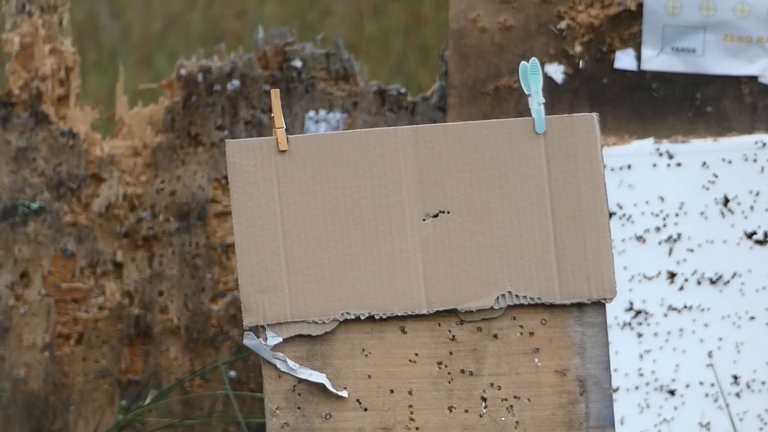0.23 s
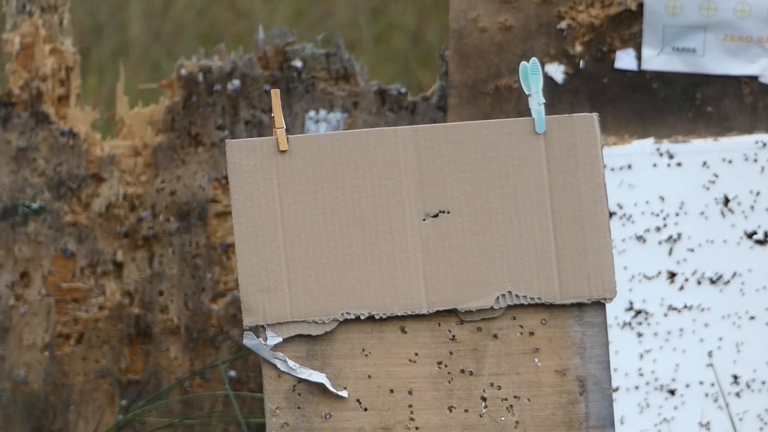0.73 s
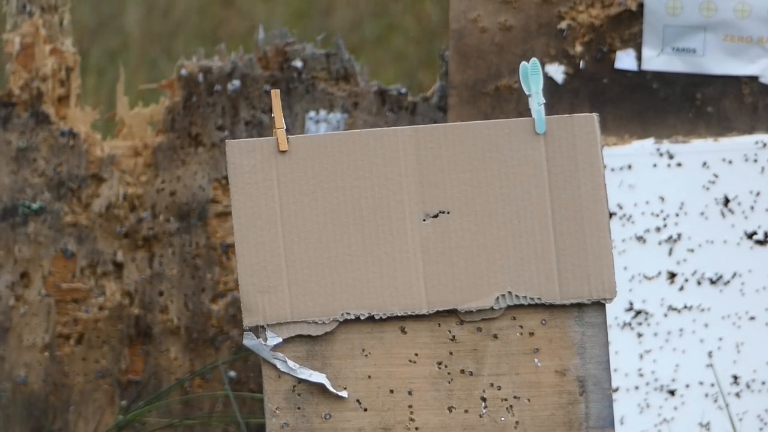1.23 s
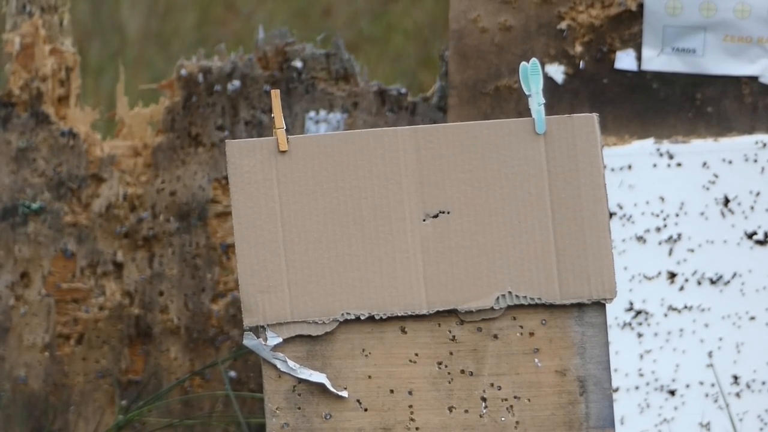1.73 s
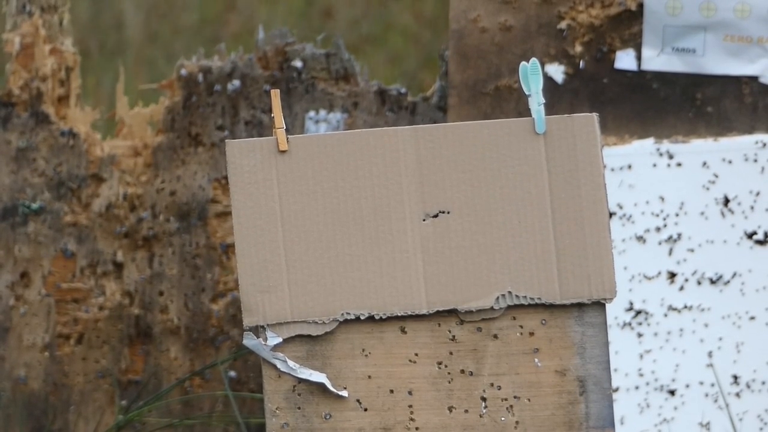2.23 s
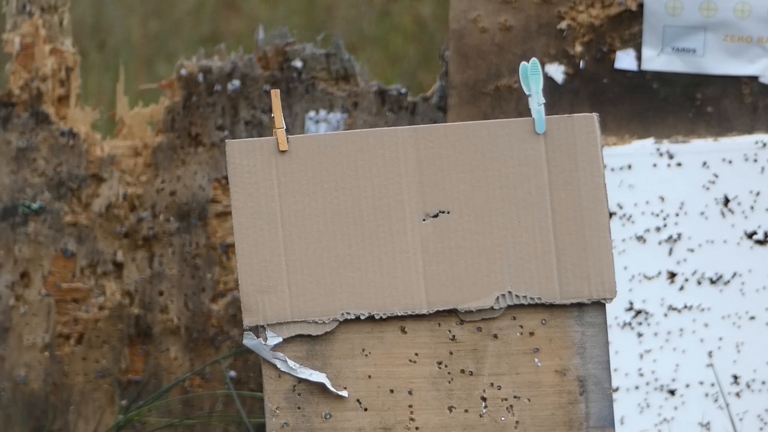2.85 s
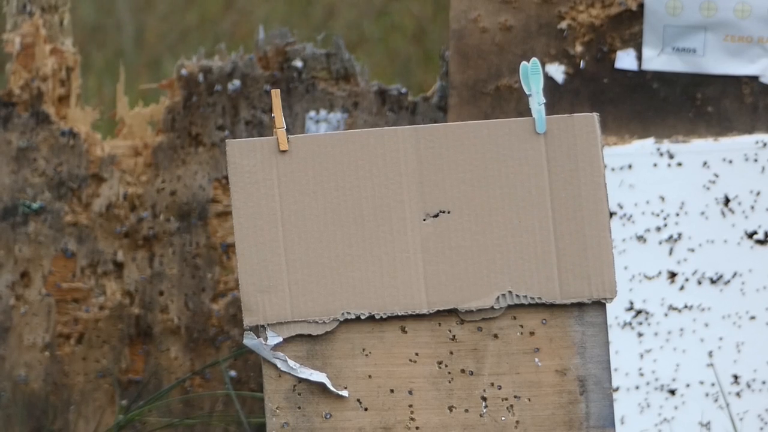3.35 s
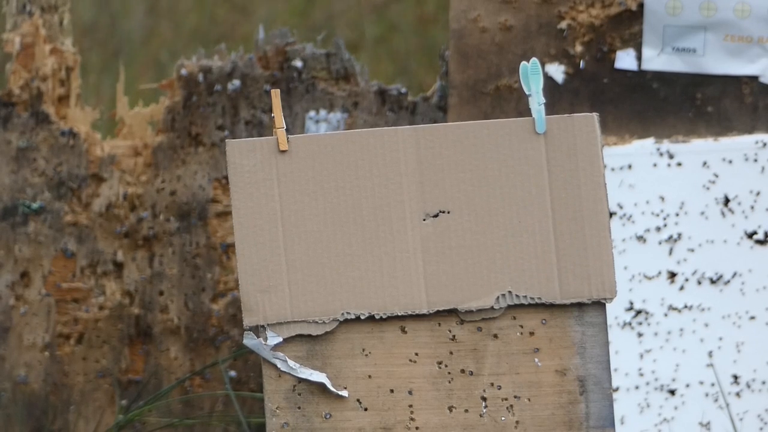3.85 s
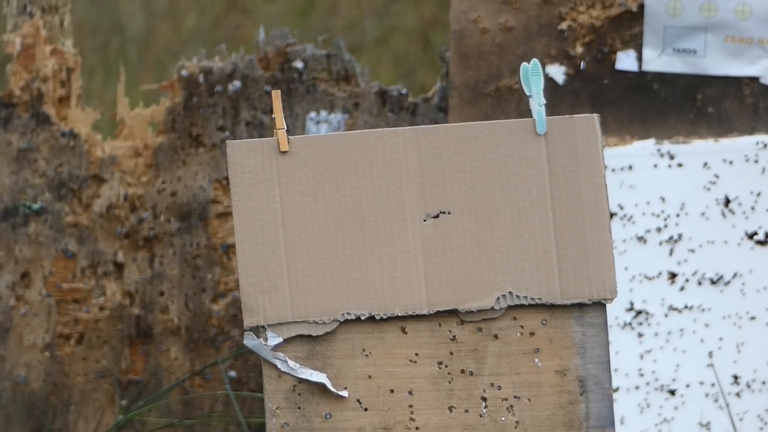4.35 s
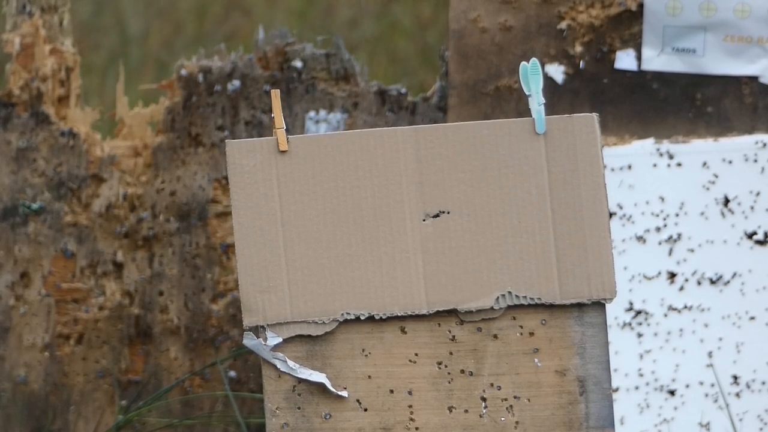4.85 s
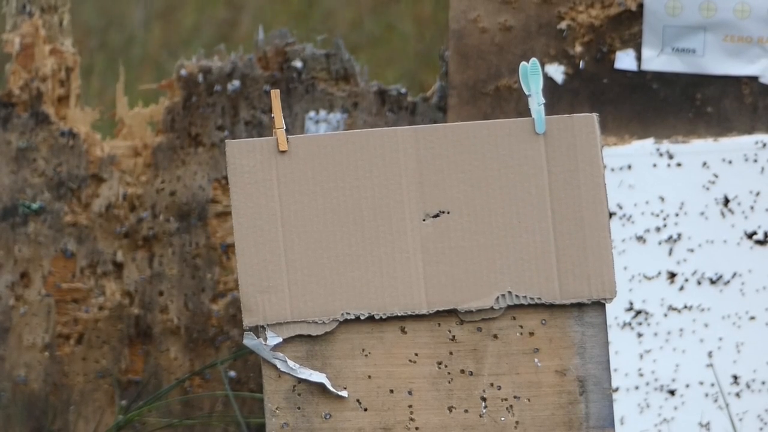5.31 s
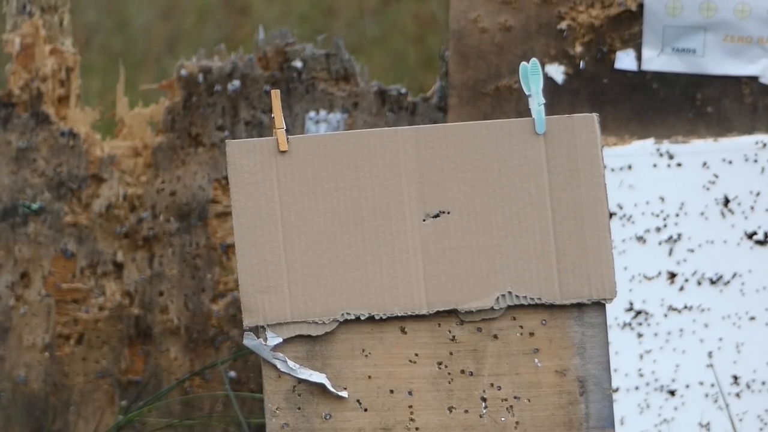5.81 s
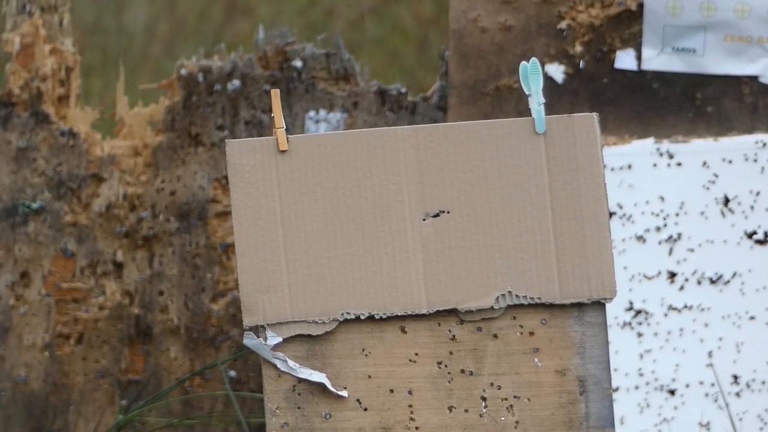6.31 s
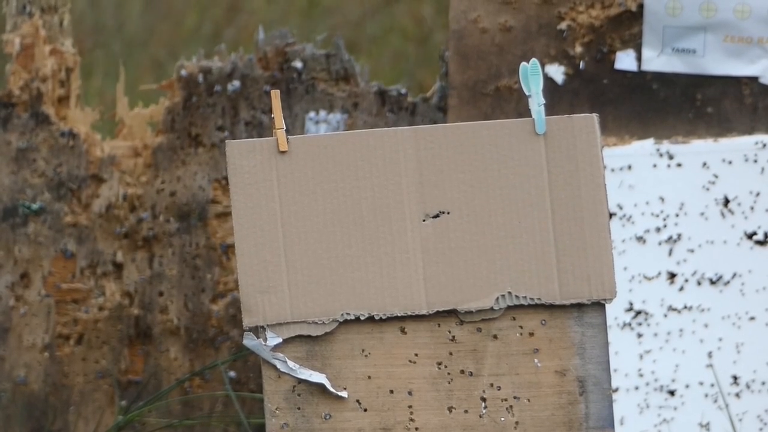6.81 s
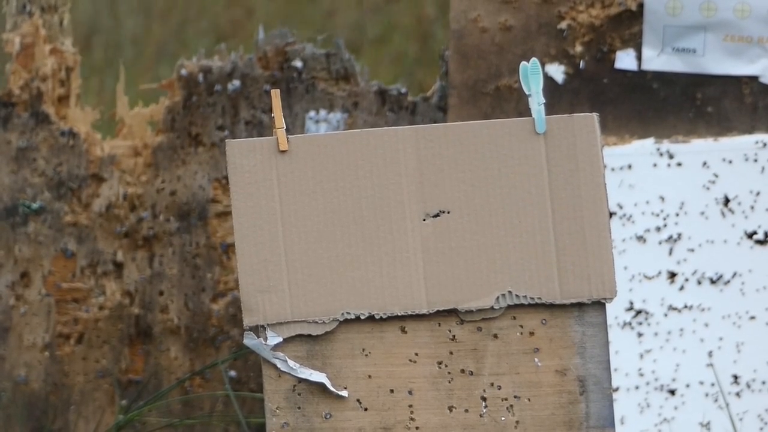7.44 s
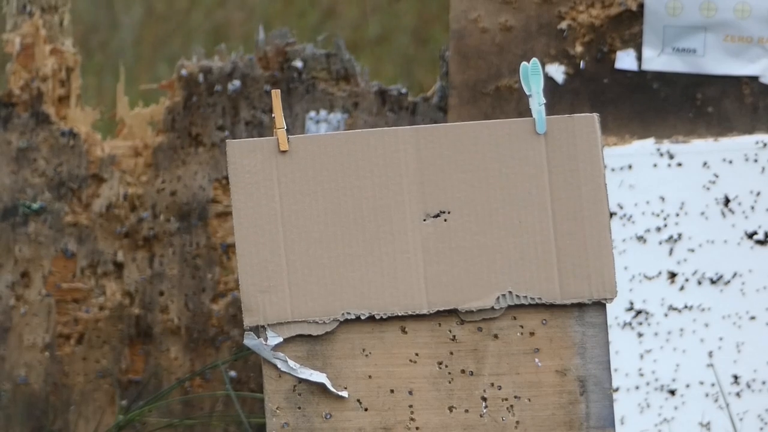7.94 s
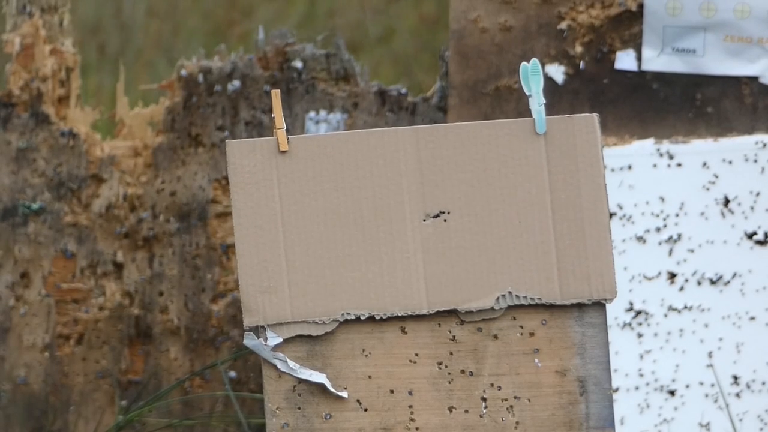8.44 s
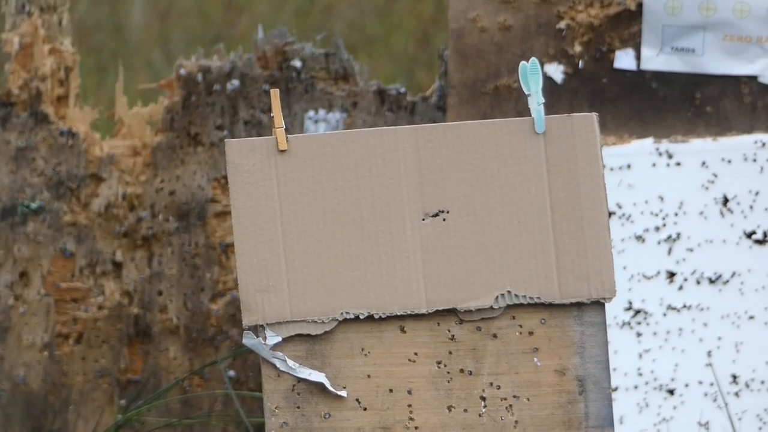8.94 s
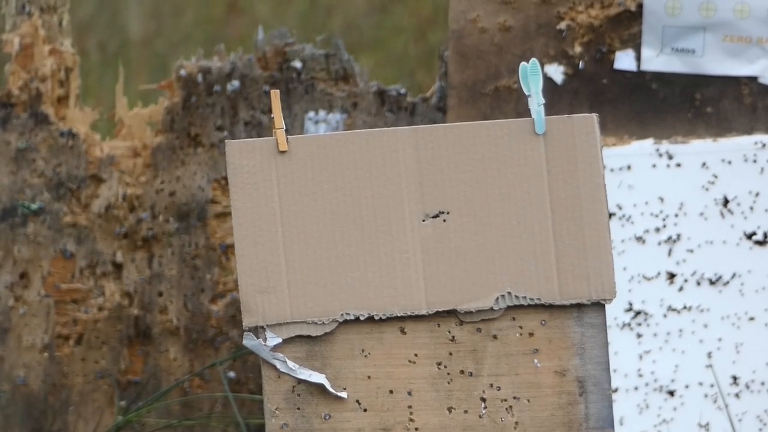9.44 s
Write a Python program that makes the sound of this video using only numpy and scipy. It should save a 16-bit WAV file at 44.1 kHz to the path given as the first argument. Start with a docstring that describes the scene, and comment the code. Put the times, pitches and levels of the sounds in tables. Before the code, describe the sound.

An outdoor range, close stereo microphone under a covered stand, faint leafy air and far traffic hush. It opens on the tail of an air rifle shot; at 0.2 s the pellet cracks on a distant steel trap, its loose flap rattling in weakening bounces. Light wind flutters at 0.5. Lever reload: sharp unlatch at 1.1, short scraping drag and stop at 1.6 to 1.75, small ticks, firm clack shut at 2.3, faint snick at 3.0. Quiet until a second dry snap at 4.3, strike at 4.5. A soft far shot at 4.8; faster reload from 5.1 to 5.85, tiny click at 6.25. A much louder neighbouring shot booms at 6.0 with rolling echo. Wind thumps at 6.8 to 7.1. Third shot at 7.6, duller, louder strike at 7.8. Heavy wind buffets from 8.6, strongest after 9.2, until the end.

```python
"""An air rifle is fired from a covered stand at an outdoor range and reloaded by its side lever.
Each pellet lands on a far steel trap a fifth of a second later; a neighbour fires further off.
Wind buffets the microphone ports, and the recorder's gain control ducks under shots and gusts."""
import sys
import numpy as np
from scipy import signal
from scipy.fft import rfft, irfft, next_fast_len
from scipy.io import wavfile
from scipy.ndimage import minimum_filter1d

SR = 44100
rng = np.random.default_rng(int(sys.argv[2]) if len(sys.argv) > 2 else 0)


def waveform_to_disk(signal):
    """Save audio, clipped to [-1, 1], as 16-bit WAV at the path in sys.argv[1]."""
    frames = np.transpose(np.atleast_2d(signal))
    scaled = np.clip(frames, -1, 1) * 32767
    samples = np.round(scaled).astype(np.int16)
    wavfile.write(sys.argv[1], SR, samples)


N = 426443

BANDS_HZ = [(120, 1200), (1200, 3500), (3500, 7500), (7500, 12500)]   # low, mid, upper, top  # fixed
LEVER = [   # (s, part, level dB, pitch struck hardest Hz)
    (1.039, "tick", -53, 3100), (1.124, "seat", -48, 2020), (1.1328, "unlatch", -20.5, 2580), (1.2411, "rebound", -36.5, 3650),
    (1.42, "scrape", -57, 2580), (1.5544, "take-up", -47.5, 6600), (1.5667, "catch", -36, 5200), (1.7554, "stop", -30.5, 5200),
    (1.8577, "tick", -41, 1450), (1.945, "nudge", -43, 1100), (1.948, "tick", -50, 3200), (1.96, "rub", -56, 1400),
    (2.0091, "tick", -38.5, 2920), (2.0413, "snick", -47, 5100), (2.2431, "seat", -44.5, 2020), (2.2605, "close", -20, 2020),
    (2.9645, "snick", -46, 4150), (5.0838, "unlatch", -20.5, 2700), (5.1765, "rebound", -30, 3100),
    (5.3712, "take-up", -47, 6600), (5.3816, "catch", -36, 6600), (5.502, "tick", -39, 5100), (5.529, "stop", -23.5, 5230),
    (5.5455, "stop", -27, 1450), (5.5774, "nudge", -40.5, 800), (5.646, "tick", -37, 2900), (5.6707, "tick", -47.5, 3100),
    (5.694, "tick", -47.5, 3000), (5.828, "seat", -47, 2020), (5.849, "close", -19, 4150), (6.2567, "snick", -44, 4150)]
# pellet strikes: (s, level dB, low, mid, upper, top band dB above it, contact s, fade t60 s, left-right dB)
PELLET = [(0.173, -17.5, -40, -6.5, -11.5, -22.5, 0.00081, 0.017, 0.0), (4.5417, -18, -42, -6, -8.5, -21, 0.0006, 0.026, 0.5),
          (7.7922, -10, -26.5, -4, -17, -28, 0.0017, 0.014, 0.5)]
NEIGHBOUR = [(4.830, -19, .005, .03, 2.5, -2), (6.0218, -.5, .0012, .014, 0.4, 1)]   # (s, level dB, attack s, hold s, tilt dB per octave, left-right dB)
SHOTS = [(-.036, 8), (4.331, 2), (7.584, 0.5)]   # (s, dB)
# stages of a shot, timed from the blast: hammer, blast, ring of the barrel, echoes close by
SHOT_STAGES = [(-.007, -30.5, -13, -6.5, -2.5, 0.5, .006, 0.09, -5), (0, -7, -13, -11, -5, -9.5, 0.0025, 0.0067, -7),
               (.004, -12, -30, -11.5, -6, -2, .003, .03, 4.5), (.012, -35.5, -31, -17.5, -7.5, -5.5, .004, 0.48, -1)]
# modes (Hz, dB, t60 s)
ACTION = [(786, -40, .03), (1100, -39, .025), (1450, -37, .02), (1830, -41, .02), (2020, -41, .02),
          (2578, -39, .04), (2740, -37, .03), (3100, -38, .02), (3675, -37, .02), (4150, -35, .018), (5100, -37, .014),
          (5420, -36, .014), (6600, -39, .015)]
BARREL = [(1539, -42.5, .02), (4370, -52, .05), (6840, -45.5, .04), (8700, -42.5, 0.045), (10800, -48, .05)]
TRAP = [(1600, -48, 0.044), (2386, -30, 0.059), (3150, -42, .06), (3735, -30, 0.09), (4500, -46, 0.066), (4875, -33, 0.13),
        (5500, -42, 0.07), (6500, -33, 0.12), (7700, -37, .09), (10050, -38, 0.079), (11050, -35, 0.13)]
# far slopes and trees scatter each pellet strike back: (s after it, dB)
RANGE = [(0, -38.5), (.04, -41.5), (0.142, -54), (.17, -57), (.3, -64), (.4, -58.5), (0.499, -58.5), (.6, -69), (.8, -70)]
STAND_DB, STAND_T60_S = -37.5, [0.27, 0.36, 0.33, .25]   # echo of the covered stand, per band
GUSTS = [   # (s, rumble dB)
    [(.43, -72), (.45, -52), (.51, -47.5), (.54, -56), (.6, -49), (.67, -59), (.7, -53), (1.02, -63)],
    [(4.05, -68), (4.15, -44), (4.28, -71)],
    [(6.766, -76), (6.79, -37.5), (6.83, -47), (6.898, -21), (6.972, -13), (6.992, -29), (7.072, -27.5), (7.192, -64),
     (7.23, -51), (7.29, -62), (7.412, -37), (7.48, -41.5), (7.52, -57)],
    [(8.614, -72), (8.654, -26), (8.686, -21), (8.798, -41.5), (9.032, -23), (9.162, -31.5), (9.21, -29.5), (9.235, -12),
     (9.34, -16), (9.418, -37), (9.446, -16), (9.54, -13), (9.604, -11), (9.65, -39), (9.67, -40)]]
BUFFETS = [   # single slaps of air: (s, peak dB, left-right dB)
    (.604, -29, 2), (6.851, -28, -1), (6.884, -28, -1), (6.947, -14, 6), (8.681, -15, -5), (8.73, -17.5, -5),
    (8.819, -24, -7), (8.999, -16.5, -7), (9.024, -18, 5), (9.117, -21.5, 0), (9.228, -14.5, 7.5), (9.443, -12, -6),
    (9.471, -8, 4), (9.524, -10, -14), (9.595, -5.5, -4.5), (9.63, -10, -2)]
RUMBLE = [(15, -63), (25, -51), (67, -7), (146, -1), (230, -2), (254, -6.5), (352, -17), (384, -19.5), (500, -25.5),
          (650, -48), (1100, -120)]   # (Hz, dB per Hz)
AIR, AIR_DB = [(12, -68), (20, -34.5), (70, -8), (101, -2), (172, 0), (204, 0.5), (367, -0.5), (590, -2.5), (1000, -5),
               (1530, -9), (1760, -9.5), (9670, -29.5), (14700, -40), (16000, -53)], -51.5   # leaves and far traffic
LIKENESS = [(60, 0.98), (180, -0.13), (550, 0.41), (1650, 0.25), (4970, 0.91), (15000, 1.0)]   # (Hz, left-right likeness)
CUTOFF_HZ = 16150   # fixed
HOLD_S, HELD_AT_START_S = 0.19, 0.16   # the overload guard keeps the gain down this long
STOCK = [(145, -35, .05), (187, -30, 0.063), (493, -33.5, 0.18), (777, -41, 0.066), (3200, -35.5, .02), (5183, -33, .018),
         (10750, -21.5, 0.031), (10490, -29, 0.061)]
BOOM = [(70, -24), (130, -8), (230, -2), (480, -4), (780, -6), (1000, -12), (2000, -19), (3300, -21), (7000, -33), (12000, -45)]   # a far shot: (Hz, dB per Hz)
BOUNCE_DB = (-76, -11, -7.5, -25)   # colour of a bounce, band by band
BOUNCE_S = (.0025, .035)   # its contact and fade
PUFF_DB, PUFF_S = -11.5, 0.0028   # the push of air from the muzzle: one pressure swing
CONTACTS = {   # parts of the reload: (low, mid, upper, top band dB, contact s, fade t60 s)
    "unlatch": (-12, 0, -5.5, -36, .004, .035), "rebound": (-18, 0, -3, -24, .004, .024), "rub": (-2, -2, -20, -30, .21, .05),
    "scrape": (-12, -0.5, -6.5, -22, 0, .1), "take-up": (-4, -4, -1, -9, 0.04, 0.2), "catch": (-7.5, -0.5, 0, -7.5, .0045, .07),
    "stop": (-14, -3, 0, -12.5, .0045, .026), "seat": (0, 0, -5.5, -19, 0.0154, 0.03), "close": (-12.5, -5, 0.5, -7, .003, 0.055),
    "tick": (-11, 0, -4, -20, .003, .024), "nudge": (0, -2, -13, -27, .004, .06), "snick": (-17, -0.5, 0, -3, .003, .018)}
LEVER_PAN_DB = -.8
SLIDES = [(1.6079, -24.5, .023), (5.4165, -25.5, .029)]   # the lever dragged through its stroke: (s, level dB, length s)
DRAG_DB, DRAG_T60_S = (-10, -8.5, -0.5, -6.5), .08   # colour by band and fade of the drag
LANDING = (-20, -5.5, -4.5, -0.5, 0.0164, 0.075)   # at the end of the stroke: (band dB against the drag, contact s, fade t60 s)
FLAP_DB = [-23.5, -19.5, -21.5]   # first bounce of the trap's loose steel flap after each pellet (level dB)
BOUNCE_GAP_S, BOUNCE_LOSS_DB, BOUNCE_SLIP_S = .028, 5.2, .0012   # five bounces, each weaker, ever less even
SETTLING = [(.409, -44), (.4794, -45), (.6, -43), (4.94, -41), (4.9894, -43), (8.0925, -44)]   # late rattles of the flap: (s, level dB)
FLUTTER_DB = [-24, -24, -25, -17.5]   # how far the brighter flutter lies under a strong rumble, gust by gust
KICK_DB, FIRST_BOUNCE_S = -6, .0315   # the pellet itself rings the flap, this far under the first bounce
STRONG_DB, FLUTTER_GROWTH = -15, .6   # in weaker air it sinks this many dB further for each dB
FAVOUR_DB, FAVOUR_OCTAVES = 10, .1   # modes near the pitch struck hardest gain this much, within this reach
UNEVEN_DB = 2.5   # each blow strikes each mode a little differently
RING_DB = [-0.5, 1, -11]   # how freely the flap rings after each pellet
THUD_DB = [-8, -10, 0]   # how much of the trap's dull box each pellet sounds
DRAG_ATTACK_S = .004   # the drag bites in gradually
SETTLING_HZ = 3720   # late rattles sound mostly this mode
FIELD_DB = None
FIELD_T60_S = None
FIELD = [(120, .6, .9), (260, .56, .6), (700, .49, .5), (1840, .41, .6), (4850, .31, .8), (12000, .25, .9)]   # the field spreads it out: (Hz, t60 s, left-right likeness)
BASS_LATE_CYCLES, FIELD_LUMPS_DB = 1.1, 1.5   # lows swell later; echoes come in clumps
BOX = [(1640, -30, .014), (2170, -39, .012), (3040, -34, .014), (3660, -37, .015), (5810, -36, .01), (6450, -36, .012)]   # the trap's dull box: (Hz, dB, t60 s)
DULL_DB = [0.1, 0.1, -9]   # change to the top band of the bounces after each pellet
STAND_BLUR, STAND_LIKENESS = .55, [.6, .85, .95, .96]   # share of the echo too dense to keep any pitch; likeness per band
RANGE_BLUR, RANGE_LIKENESS = .8, .92   # the same for the strike's echo from the range
THUMP, THUMP_LATE_S = [(203, -22, .06)], .012   # the stock answers firm contacts with a late low thump: (Hz, dB, t60 s)
THUMP_DB = {"unlatch": -17, "close": -20, "catch": -6}   # against the contact


def from_db(db):
    return 10 ** (np.asarray(db) / 20)


def rms_one(x):
    return x / np.sqrt(np.mean(x ** 2) + 1e-20)


def at_hz(points, hz):
    return np.interp(np.log(hz), np.log(np.array(points)[:, 0]), np.array(points)[:, 1])


def band(x, low_hz, high_hz):
    return signal.sosfilt(signal.butter(2, [low_hz, high_hz], "band", fs=SR, output="sos"), x)


def lag(x, seconds):
    """One-pole smoothing."""
    r = np.exp(-1 / (seconds * SR))
    return signal.lfilter([1 - r], [1, -r], x)


def drift(rate):
    """Slow chance with spread 1."""
    r = np.exp(-80 * np.pi * rate / SR)  # fixed
    slow = signal.lfilter([1], [1, -2 * r, r * r], rng.standard_normal(N // 40 + 1002))[1000:]
    return np.interp(np.arange(N) / 40, np.arange(len(slow)), rms_one(slow))


def coloured(spectrum, alike, channels=2):
    """Stereo noise of a given spectrum; alike is the left-right likeness at each frequency."""
    size = next_fast_len(N)
    hz = np.arange(size // 2 + 1) * SR / size + 1
    mid, side = rfft(rng.standard_normal((channels, size))) * from_db(at_hz(spectrum, hz))
    alike = np.clip(at_hz(alike, hz), -1, 1)
    pair = np.sqrt(1 + alike) * mid + np.sqrt(1 - alike) * side * [[1], [-1]]
    return rms_one(irfft(pair, size)[:, :N])


def knocks(rows, modes, struck_db=None, apart=.2, attack=.00075, grain_db=2.2, grain_s=.0015, snap=0):
    """Each knock is a grainy rattle that holds, then fades; it sounds band by band and sets the modes ringing."""
    t, out, (plain, rings) = np.arange(SR // 2) / SR, np.zeros((len(BANDS_HZ), 2, N)), body(modes)
    for k, (s, peak_db, *colour_db, contact, t60, pan_db) in enumerate(rows):
        strengths = from_db(UNEVEN_DB * rng.standard_normal(len(modes)) + (struck_db[k] if struck_db else 0))
        answers = (plain + np.tensordot(strengths, rings, axes=1))[:, None]
        shape = from_db(-60 * np.maximum(t - contact, 0) / max(t60, 1e-3)) * np.minimum(t / attack, 1)
        grain = np.interp(t, np.arange(400) * grain_s, rng.standard_normal(400))   # fixed
        mid, side = shape * from_db(grain_db * grain) * rng.standard_normal((2, len(t)))
        mid[round(attack * SR)] += snap * np.sqrt(np.sum(shape ** 2))   # one clean crack leads
        rattle = (mid + apart * side * [[1], [-1]])[None, :, t < contact + t60]
        gains = from_db(peak_db + np.add.outer(colour_db, [pan_db / 2, -pan_db / 2]))
        sound = signal.fftconvolve(rattle, answers, axes=2)
        due = np.sum(shape ** 2)   # a blow puts a set energy into each band
        gains = gains * np.sqrt(due / np.sum(sound ** 2, axis=2).mean(axis=1))[:, None]
        sound = gains[..., None] * sound
        at = round(s * SR)
        out[..., max(at, 0):at + sound.shape[2]] += sound[..., max(-at, 0):]
    return out


def scattered(x, envelope, alike):
    """Dense echoes under an envelope, partly shared by both sides."""
    mid, side = rng.standard_normal((2, len(envelope))) * envelope
    paths = np.sqrt(alike) * mid + np.sqrt(1 - alike) * side * [[1], [-1]]
    return signal.oaconvolve(x.mean(axis=0, keepdims=True), paths, axes=1)[:, :N]


def rifle():
    """Shots and lever work, close by, with the short echo of the stand."""
    stages = [(s + delay, level_db + db, *rest) for s, level_db in SHOTS for delay, db, *rest in SHOT_STAGES]
    close, t = knocks(stages, BARREL, apart=0.28) + reload(), np.arange(SR // 2) / SR
    dying = [from_db(STAND_DB - 60 * t / t60) * (t > .004) for t60 in STAND_T60_S]
    return close.sum(axis=0) + echoes(close, dying, STAND_LIKENESS, STAND_BLUR) + puffs()


def trap():
    """The pellet cracks on the trap, its flap rings as it bounces, and the whole range answers."""
    strike = knocks(PELLET, BOX, THUD_DB, snap=1.3)
    rows, struck_db = bounces()
    flap = knocks(rows, TRAP, struck_db).sum(axis=0)
    after, level_db = np.transpose(RANGE)
    slopes = from_db(np.interp(np.arange(SR) / SR, after, level_db))
    echo = echoes(strike, [slopes] * len(strike), [RANGE_LIKENESS] * len(strike), RANGE_BLUR)
    echo = echo + scattered(1.27 * flap, slopes, RANGE_LIKENESS)
    return strike.sum(axis=0) + flap + band(echo, 1030, 8400)


def wind():
    """Eddies on the ports: lumpy rumble, a spikier flutter above it, and single slaps."""
    t, rumble_db, flutter_db = np.arange(N) / SR, np.full(N, -120.), np.full(N, -120.)
    for gust, under_db in zip(GUSTS, FLUTTER_DB):
        s, level_db = np.transpose(gust)
        inside = (t >= s[0]) & (t <= s[-1])
        rumble_db[inside] = np.interp(t[inside], s, level_db)
        flutter_db[inside] = rumble_db[inside] + under_db + FLUTTER_GROWTH * (rumble_db[inside] - STRONG_DB)
    lumps = np.array([drift(25), drift(36)]) + 0.34 * drift(6.7)
    rumble = coloured(RUMBLE, [(60, .85), (150, 0.97), (400, .1)]) * from_db(lag(rumble_db + 119.5, 0.0014) - 120 + 3.17 * lumps)
    flutter = coloured([(200, -20), (380, -1.5), (700, -13.5), (1500, -32), (3000, -46)], [(300, .2), (700, -.45), (1400, -.5), (2400, 0)])
    flutter = flutter * from_db(lag(flutter_db + 120, 0.0013) - 120 + 3.5 * lumps + 3.53 * np.array([drift(70), drift(70)]))
    slaps = np.zeros((2, N))
    for s, peak_db, pan_db in BUFFETS:
        slaps[:, round(s * SR)] = from_db(peak_db + np.array([pan_db, -pan_db]) / 2)
    slap = band(lag(lag(1. * (t[:SR // 10] == 0), 0.0007), 0.0007), 99, 520)
    return band(rumble + flutter, 80, 2000) + signal.oaconvolve(slaps, [slap / np.abs(slap).max()], axes=1)[:, :N]


def body(modes):
    """Answer to a click, steep-edged: each plain band, and each mode with the band it lies in."""
    t, plain, rings = np.arange(SR // 5) / SR, [], np.zeros((len(modes), len(BANDS_HZ), SR // 5))
    for k, (low, high) in enumerate(BANDS_HZ):
        tones = [from_db(db - 60 * t / t60) * np.sin(2 * np.pi * hz * t) * (low <= hz < high) + 1e-18 for hz, db, t60 in modes]
        click, *tones = band([band(1. * (t == 0), low, high), *tones], .8 * low, high * 1.2) * np.sqrt(SR / 2 / (high - low))  # fixed
        plain.append(click)
        rings[:, k] = tones
    return np.array(plain), rings




def puffs():
    """One sawtooth swing of pressure for each shot, thinned by the microphone's weak bass."""
    t = np.arange(N) / SR
    swings = sum(from_db(db + PUFF_DB) * (2 * (t - s) / PUFF_S - 1) * (np.abs(t - s - PUFF_S / 2) < PUFF_S / 2) for s, db in SHOTS)
    return band(swings + 1e-18, 110, 600) * from_db([[-1.5], [1.5]])


def reload():
    """Lever contacts ring the action; each drag chatters along the stock and lands at the end of its stroke."""
    contacts = [(s, db, *CONTACTS[part], LEVER_PAN_DB) for s, part, db, hz in LEVER]
    thumps = [(s + THUMP_LATE_S, db + THUMP_DB[part], 0, -60, -60, -60, .006, .02, LEVER_PAN_DB)
              for s, part, db, hz in LEVER if part in THUMP_DB]
    drags = [(s - DRAG_ATTACK_S, db, *DRAG_DB, length + DRAG_ATTACK_S, DRAG_T60_S, LEVER_PAN_DB) for s, db, length in SLIDES]
    landings = [(s + length, db, *LANDING, LEVER_PAN_DB) for s, db, length in SLIDES]
    return (knocks(contacts, ACTION, [favouring(ACTION, row[-1]) for row in LEVER], grain_db=2.2)
            + knocks(thumps, THUMP, attack=.004)
            + knocks(drags + landings, STOCK, attack=DRAG_ATTACK_S * 1.35, grain_db=4.0, grain_s=0.00252))


def bounces():
    """The kick of each pellet, a dying run of bounces after it, and a few late rattles; with the dB given to the modes."""
    k = np.arange(5)
    after = FIRST_BOUNCE_S + BOUNCE_GAP_S * k + BOUNCE_SLIP_S * k * rng.standard_normal((len(PELLET), len(k)))
    rows, struck_db = [(s, db, 0) for s, db in SETTLING], [favouring(TRAP, SETTLING_HZ)] * len(SETTLING)
    for (s, *_), first_db, ring_db, dull_db, run in zip(PELLET, FLAP_DB, RING_DB, DULL_DB, after):
        rows += [(s, first_db + KICK_DB, dull_db), *zip(s + run, first_db - BOUNCE_LOSS_DB * k, [dull_db] * len(k))]
        struck_db += [ring_db] * (len(k) + 1)
    return [(s, db, *BOUNCE_DB[:-1], BOUNCE_DB[-1] + dull_db, *BOUNCE_S, 1.0) for s, db, dull_db in rows], struck_db


def favouring(modes, hz):
    """Extra dB for the modes that lie near one pitch."""
    return FAVOUR_DB * np.exp(-(np.log2(np.array(modes)[:, 0] / hz) / FAVOUR_OCTAVES) ** 2 / 2)


def neighbour():
    """Far shots arrive as a wash of echoes: half-octave bands that swell, hold and die at their own rates."""
    t, out, edges = np.arange(SR * 3 // 4) / SR, np.zeros((2, N)), 70 * 2 ** np.arange(0, 7.6, .5)  # fixed
    hz_s, t60s, alikes = np.transpose(FIELD)
    for s, level_db, attack, hold, tilt_db, pan_db in NEIGHBOUR:
        lumps_db, at = FIELD_LUMPS_DB * drift(30)[:len(t)], round(s * SR)
        for low, high in zip(edges, edges[1:]):
            hz = np.sqrt(low * high)
            t60, alike = [np.interp(np.log(hz), np.log(hz_s), column) for column in (t60s, np.clip(alikes, 0, 1))]
            swell = np.minimum(t / (attack + BASS_LATE_CYCLES / hz), 1) * from_db(lumps_db - 60 * np.maximum(t - hold, 0) / t60)
            mid, side = rng.standard_normal((2, len(t))) * swell
            gain = from_db(level_db + at_hz(BOOM, hz) + tilt_db * np.log2(hz / 500) + np.array([[pan_db], [-pan_db]]) / 2)
            out[:, at:at + len(t)] += gain * band(np.sqrt(alike) * mid + np.sqrt(1 - alike) * side * [[1], [-1]], low, high)
    return out


def echoes(parts, envelopes, alikes, blur):
    """Dense echoes of each band under its envelope: some keep the sound's pitch, the rest are a blur."""
    out, blur = 0, np.clip(blur, 0, 1)
    for part, envelope, alike, edges in zip(parts, envelopes, np.clip(alikes, 0, 1), BANDS_HZ):
        power = np.maximum(signal.oaconvolve(part.mean(axis=0) ** 2, envelope ** 2)[:N], 0)
        mid, side = band(band(rng.standard_normal((2, N)), *edges), *edges)
        hiss = rms_one(np.sqrt(alike) * mid + np.sqrt(1 - alike) * side * [[1], [-1]])
        out = out + np.sqrt(1 - blur) * scattered(part, envelope, alike) + np.sqrt(blur * power) * hiss
    return out


def scene():
    air = from_db(AIR_DB + 1.7 * drift(1)) * coloured(AIR, LIKENESS)
    return rifle() + trap() + neighbour() + wind() + air


def record(dry):
    """A slow gain control rides long loud sounds; an overload guard cuts hard after a sharp peak, holds, lets go."""
    level_db = 10 * np.log10(lag((dry ** 2).mean(axis=0), 0.022) + 1e-12)
    fall = 48 * np.arange(N) / SR   # dB given back as time passes
    ride_db = np.maximum.accumulate(0.54 * np.maximum(level_db + 28.5, 0) + fall) - fall
    sharp_db = 20 * np.log10(np.abs(band(dry, 1400, 10000)).max(axis=0) + 1e-9)
    cut_db = np.clip(5.0 * (sharp_db + 6.5), 0, 14.5)
    hold = round(HOLD_S * SR) | 1
    held_db = -minimum_filter1d(-cut_db, hold, origin=hold // 2, mode="nearest")
    held_db[:round(HELD_AT_START_S * SR)] = held_db.max()   # a shot has just gone off
    ease = held_db[0] + lag(held_db - held_db[0], 0.01)   # the cut comes in gently; on release at most 11.5 dB remains, easing away over about 10 ms
    gain = from_db(-np.maximum(lag(ride_db, 0.0069), np.minimum(ease, held_db + 11.5)))
    return signal.sosfilt(signal.cheby2(12, 70, CUTOFF_HZ * 1.04, fs=SR, output="sos"), .95 * np.tanh(dry * gain / .95))  # fixed


dry = scene()
out = record(dry)
waveform_to_disk(out)
```